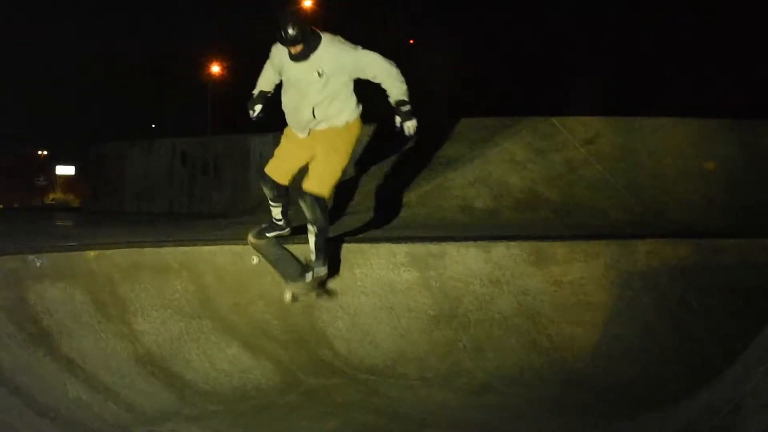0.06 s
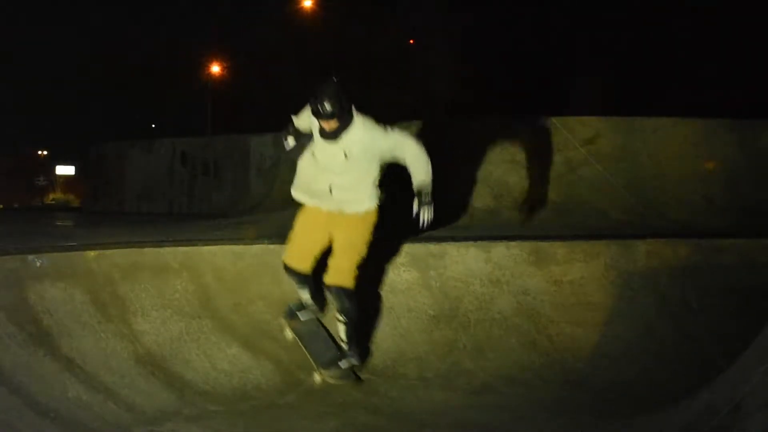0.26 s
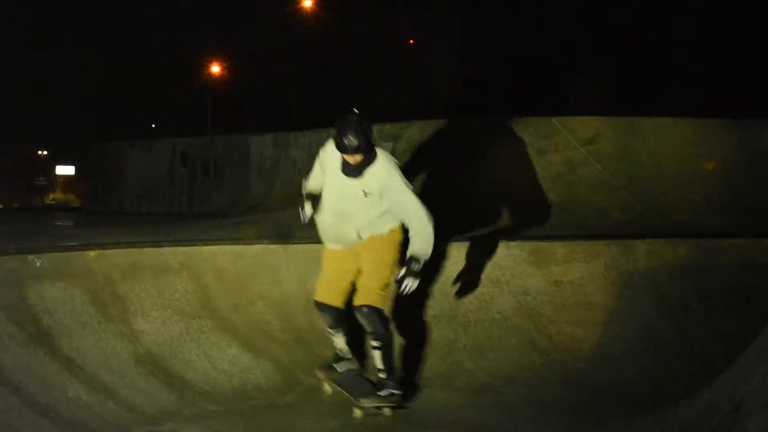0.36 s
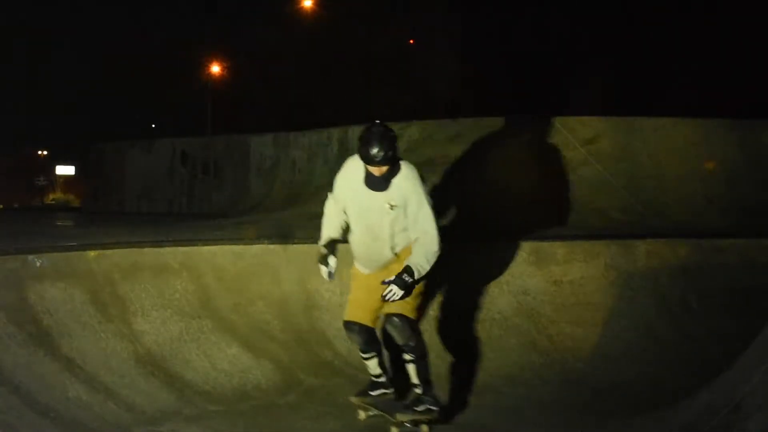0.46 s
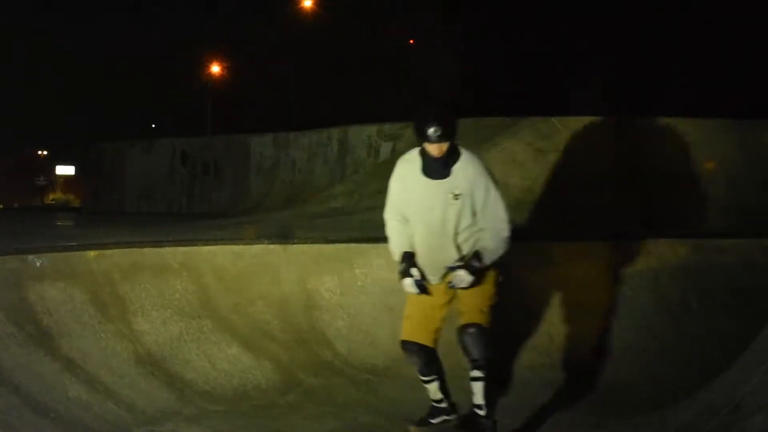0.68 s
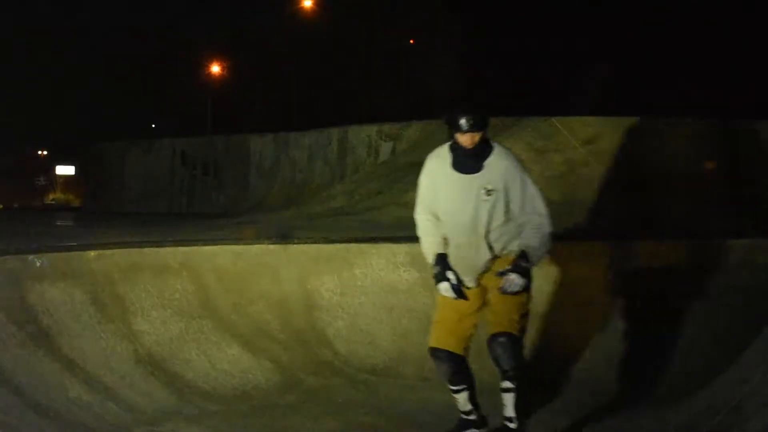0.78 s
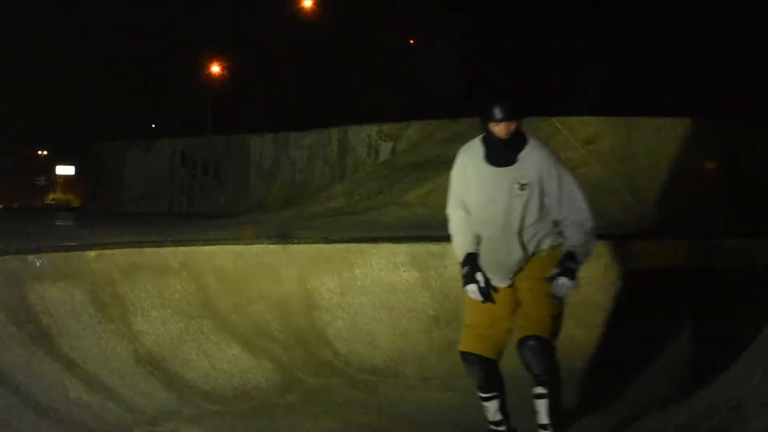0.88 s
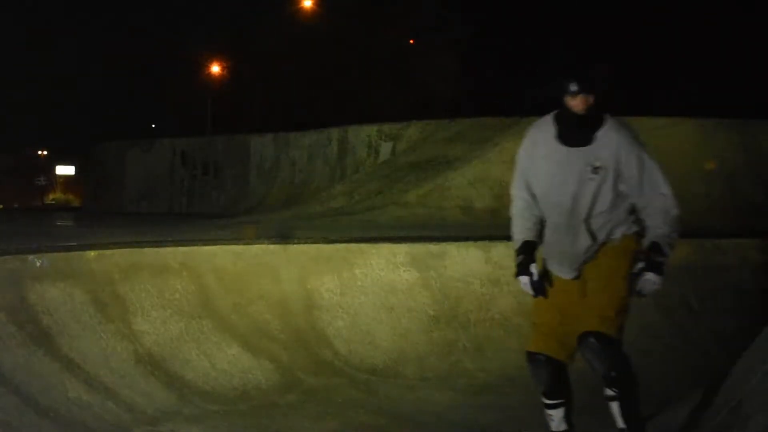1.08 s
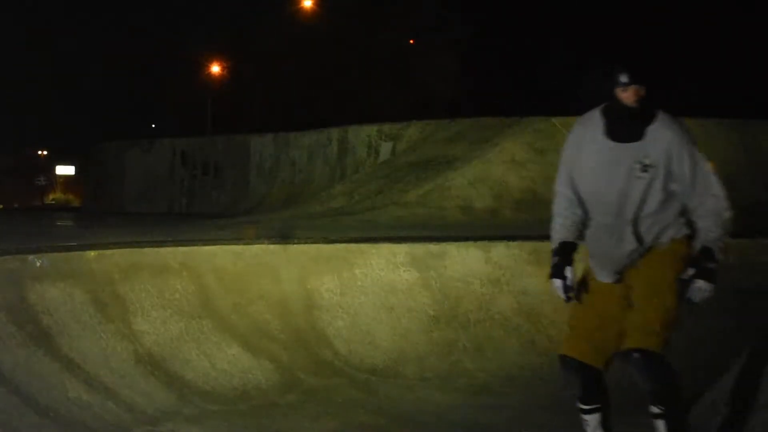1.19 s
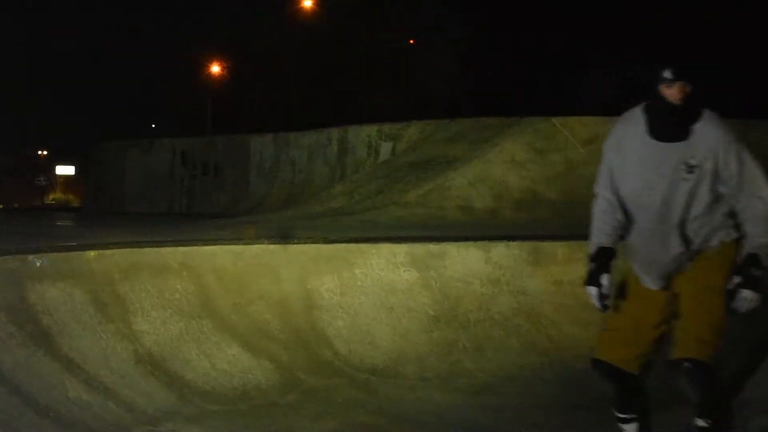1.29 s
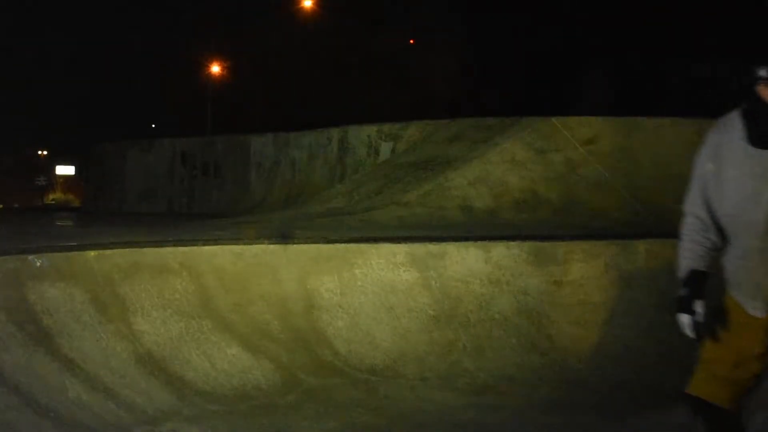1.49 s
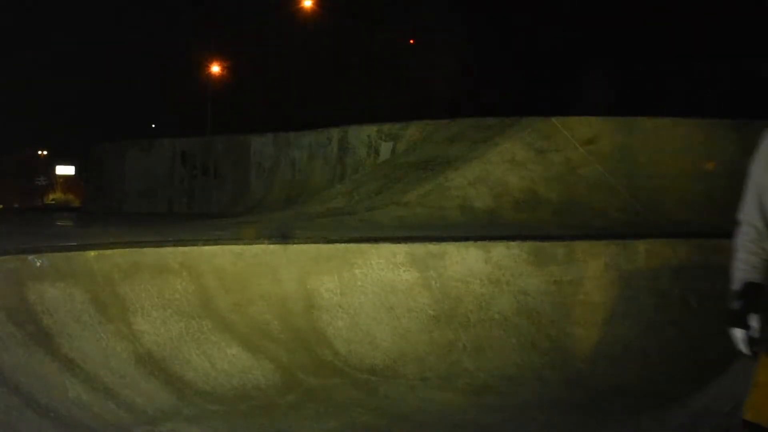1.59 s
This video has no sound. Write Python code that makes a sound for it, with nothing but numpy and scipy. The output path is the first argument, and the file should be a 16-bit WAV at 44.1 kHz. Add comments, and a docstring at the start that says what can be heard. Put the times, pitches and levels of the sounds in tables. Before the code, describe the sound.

A skateboard slams onto concrete at about 0.2 seconds, just after a faint shoe scuff, in a quick ringing clatter that overloads the microphone. From 0.3 seconds the wheels rumble over grit, bumping across seams near 0.6, 1.1 and 1.2 seconds. They then sing faintly in a turn until about 1.6 seconds, with a sharp metal click at 1.4. A soft echo and quiet machine hum lie underneath.

```python
"""A machine hums at night and shoes scuff briefly as a skateboard drops into a concrete bowl.
Wheels and deck (the wooden board) slam down in a quick, ringing clatter that overloads the microphone.
The wheels then rumble over grit, bump across seams and sing as they scrub sideways in a turn.
The bowl adds a soft echo, and the hum swells and fades underneath."""
import sys
import numpy as np
from scipy import signal
from scipy.fft import rfft, irfft, next_fast_len
from scipy.io import wavfile
from scipy.ndimage import map_coordinates

SR = 44100
rng = np.random.default_rng(int(sys.argv[2]) if len(sys.argv) > 2 else 0)


def master(y):
    """Save y as 16-bit WAV."""
    cut = np.clip(np.atleast_2d(y).T, -1, 1)
    pcm = np.round(cut * 32767)  # scale
    wavfile.write(sys.argv[1], SR, pcm.astype(np.int16))


N = 72765  # samples: 1.65 s


def amp(db):
    """Turn decibels into a volume multiplier."""
    return 10 ** (np.asarray(db) / 20)


def unit(x):
    """Scale a signal to an average (rms) level of 1."""
    return x / np.sqrt(np.mean(x ** 2) + 1e-20)


def along(points, hz):
    """Read between rows of (pitch_hz, value), with octaves evenly spaced."""
    pitches, values = np.transpose(points)
    return np.interp(np.log(hz + 1), np.log(pitches + 1), values)


def curves(rows):
    """Join rows of (time_s, values...) with straight lines, one curve per value."""
    times, *columns = np.transpose(rows)
    return [np.interp(np.arange(N) / SR, times, column) for column in columns]


def wobble(rate):
    """A smooth curve through `rate` random points a second."""
    return map_coordinates(rng.standard_normal(N // 10), [np.arange(N) * rate / SR], order=3)


def colour(x, spectrum):
    """Shape the tone of x. A colour lists how strong each pitch is compared with the others."""
    size = 4096
    gains = unit(amp(along(spectrum, np.fft.rfftfreq(size, 1 / SR))))
    cepstrum = irfft(np.log(gains))
    # fold it so that the filter never sounds ahead of a hit
    cepstrum[1:size // 2] *= 2
    cepstrum[size // 2 + 1:] = 0
    response = irfft(np.exp(rfft(cepstrum)))
    return signal.fftconvolve(x, response)[:len(x)]


def add(out, start_s, x):
    """Mix x into out from start_s on."""
    part = out[round(start_s * SR):][:len(x)]
    part += x[:len(part)]


def fade(fade_s, size=8192):
    """The dying away of one hit: 60 dB quieter after fade_s."""
    return np.exp(-np.log(1000) * np.arange(size) / SR / fade_s)


def ping(hz, fade_s):
    """One ringing tone that builds up within half a cycle and dies away."""
    shape = fade(fade_s)
    cycles = hz * np.arange(len(shape)) / SR
    return shape * (1 - np.exp(-2 * cycles)) * np.sin(2 * np.pi * cycles)


def bursts(rows, spectrum):
    """Rough contacts: a puff of noise for each row of (start_s, level_db, fade_s)."""
    out = np.zeros(N)
    for start_s, db, fade_s in rows:
        shape = fade(fade_s)
        burst = colour(shape * rng.standard_normal(len(shape)), spectrum)
        add(out, start_s, amp(db) * burst * np.linalg.norm(shape) / np.linalg.norm(burst))
    return out


def grains(per_s=5000, spread_db=1.5):
    """Tiny random knocks against a gritty surface."""
    hit = rng.random(N) < per_s / SR
    return hit * rng.standard_normal(N) * amp(spread_db * rng.standard_normal(N))


def machine(hum_hz=106.6):
    """A machine's low, wavering hum with a thin whine above it."""
    def tone(hz, drift):
        pitch_hz = hz * (1 + drift * wobble(11.84))
        return np.sqrt(2) * np.sin(2 * np.pi * np.cumsum(pitch_hz) / SR)
    # swelling and fading of the hum: time_s, level_db
    hum_levels = [(0, -38), (.25, -47), (.34, -59), (.47, -49), (.55, -44), (.8, -36), (.95, -39.5),
                  (1.35, -42), (1.5, -52), (1.65, -46.5)]
    # tones of the whine: pitch_hz, level_db
    whine_tones = [(571, -46.5), (856, -47), (1432, -55.5)]
    hum_db, = curves(hum_levels)
    hum = amp(hum_db + 1.3 * wobble(14)) * tone(hum_hz, drift=.012)
    whine = sum(amp(db) * tone(hz, drift=.001) for hz, db in whine_tones)
    return hum + whine


def night_air():
    """A soft, steady rush of air."""
    # colour of the air: pitch_hz, relative_db
    air_colour = [(20, -30), (50, 1), (75, -2), (200, 5), (350, -2.5), (700, -9.5), (1400, -4.5),
                  (2500, -20.5), (6000, -28), (12000, -48), (16000, -37)]
    return amp(-40) * unit(colour(rng.standard_normal(N), air_colour))


def bowl_echo(x, level_db=-22):
    """The concrete walls throw sound back; high pitches die sooner than low ones."""
    # length of the echo: pitch_hz, fade_s
    fade_times = [(100, 1), (500, 0.85), (2000, 0.49), (6000, 0.31), (14000, 0.42)]
    hz, time_s, noise = signal.stft(rng.standard_normal(SR), SR, nperseg=256)
    decay = np.exp(-np.log(1000) * time_s / along(fade_times, hz)[:, None])
    _, tail = signal.istft(noise * decay, SR, nperseg=256)
    return amp(level_db) * signal.fftconvolve(x, tail / np.linalg.norm(tail))[:N]


def takeoff():
    """Shoes scuff the board's grip tape, then the first wheels brush the wall."""
    # the scuff: time_s, level_db
    scuff_levels = [(.065, -75), (.08, -42.5), (.096, -50), (.11, -65)]
    # soft touch of the wheels: start_s, level_db, fade_s
    touch = [(.2125, -24.5, 0.034)]
    # their colours: pitch_hz, relative_db
    scuff_colour = [(1500, -37), (3000, -7), (3750, 1), (4500, -12), (8000, -13), (16000, -21)]
    touch_colour = [(40, -36), (120, -18), (210, 5), (350, -6), (800, -5), (3000, -37)]
    scuff_db, = curves(scuff_levels)
    scuff = amp(scuff_db) * unit(colour(grains(), scuff_colour))
    return scuff + bursts(touch, touch_colour)


def rattle(fade_s=.016):
    """Loose hardware ticks lightly."""
    # the ticks: start_s, level_db
    ticks = [(0.1022, -36), (0.108, -38), (0.125, -40), (0.152, -41), (.177, -34.5), (.196, -38),
             (1.278, -40), (1.361, -39), (1.392, -37), (1.401, -39)]
    # their colour: pitch_hz, relative_db
    tick_colour = [(500, -22), (3000, 1), (6500, -2.5), (9000, -4), (11500, 4), (13000, -9), (16000, -9)]
    return bursts([(start_s, db, fade_s) for start_s, db in ticks], tick_colour)


def stone_click():
    """A small stone clicks sharply under the wheels and rings."""
    # the click: start_s, level_db, fade_s
    clicks = [(1.4221, -14, 0.012)]
    # its colour: pitch_hz, relative_db
    click_colour = [(100, -30), (800, 0.5), (1300, -1), (1900, 9), (2400, -15), (3100, -9), (6000, -16),
                    (8500, -7.5), (12000, -16), (16000, -22)]
    # ringing tones of the click: pitch_hz, relative_db, fade_s
    click_tones = [(1763, -1, .025), (3040, -9, 0.018)]
    out = bursts(clicks, click_colour)
    for start_s, db, _ in clicks:
        for hz, tone_db, fade_s in click_tones:
            add(out, start_s, amp(db + tone_db) * ping(hz, fade_s))
    return out


def seam_bumps():
    """Wheels cross seams in the concrete, each with a scrape and a thump."""
    # the crossings: start_s, scrape_db, fade_s, thump_hz, thump_db
    seams = [(.4345, -29, .02, 600, -20), (0.6159, -22, 0.019, 1160, -20), (0.6191, -24, 0.021, 1930, -22),
             (1.06, -18.5, 0.034, 497, -20), (1.0636, -21, 0.031, 656, -22),
             (1.072, -22.5, 0.027, 510, -10), (1.0757, -20.5, 0.021, 750, -15.5),
             (1.205, -25.5, 0.03, 406, -18), (1.2203, -19.5, 0.016, 436, -6.5)]
    # colour of the scrape: pitch_hz, relative_db
    scrape_colour = [(40, -38), (200, -5), (400, 4), (750, 3), (1100, -9), (1600, -3.5), (3000, -16.5),
                     (6000, -20.5), (10000, -20.5), (16000, -31)]
    out = bursts([row[:3] for row in seams], scrape_colour)
    for start_s, _, fade_s, thump_hz, thump_db in seams:
        add(out, start_s, amp(thump_db) * ping(thump_hz, fade_s))
    return out


def carve(width_hz=540):
    """Wheels scrub sideways and sing: a narrow band of noise that rises a little, then sinks."""
    # the singing: time_s, pitch_hz, level_db
    glide = [(1.0, 1623, -62), (1.22, 1629, -38), (1.33, 1730, -36.5), (1.45, 1694, -34), (1.5, 1624, -34),
             (1.59, 1540, -31), (1.65, 1523, -34)]
    hz, db = curves(glide)
    lowpass = signal.butter(2, width_hz / 2, fs=SR)
    slow_a, slow_b = signal.lfilter(*lowpass, rng.standard_normal((2, N)))
    phase = 2 * np.pi * np.cumsum(hz) / SR
    return amp(db) * unit(slow_a * np.cos(phase) + slow_b * np.sin(phase))


def rolling(turn_hz=15.4, pulse_db=1, rough_db=1.2):
    """Grit shakes the board, scrapes and hisses, pulsing a little with each turn of the wheels."""
    # loudness of the three layers: time_s, rumble_db, scrape_db, hiss_db
    levels = [(0, -66, -59, -59.5), (.09, -45, -50, -61), (.21, -42, -47.5, -53), (.3, -29, -38.5, -45),
              (.42, -27.5, -37, -39), (.5, -32.5, -41, -42.5), (0.589, -34.5, -47.5, -49),
              (.72, -34, -49, -49.5), (.77, -31, -45.5, -48.5), (.88, -32, -43.5, -44.5),
              (1.0, -31.5, -43.5, -50), (1.1, -34.5, -40.5, -47.5), (1.17, -36, -49.5, -56),
              (1.3, -39, -46.5, -54.5), (1.39, -39, -45.5, -49.5), (1.5, -34, -47, -52.5),
              (1.59, -37, -44, -54.5), (1.62, -33.5, -36.5, -43), (1.65, -40, -40, -51)]
    # their colours: pitch_hz, relative_db
    rumble = [(40, -26.5), (150, -16.5), (270, -2), (390, 0), (530, 1.5), (640, -5.5), (780, 1.5),
              (1100, -9), (1700, -12.5), (2100, -15.5), (3000, -22.5), (6000, -52), (16000, -80)]
    scrape = [(300, -22), (1500, 3.5), (2300, 5.5), (3200, 0), (4500, -2), (6000, -7), (9000, -20),
              (16000, -52)]
    hiss = [(2000, -26), (5500, -5.5), (8000, 1), (10000, 2.5), (12500, 0), (14500, -7.5), (16000, -14)]
    wheel_angle = 2 * np.pi * turn_hz * np.arange(N) / SR + wobble(2.1)
    flutter_db = rough_db * wobble(60.16) - pulse_db * np.sin(wheel_angle)
    out = np.zeros(N)
    for db, spectrum in zip(curves(levels), (rumble, scrape, hiss)):
        grit = grains() + 0.27 * rng.standard_normal(N)
        out += amp(db + flutter_db) * unit(colour(grit, spectrum))
    return out


def landing(detune=0.0056, pivot_hz=1000):
    """Each blow cracks, thuds through the wheels and rings the deck; harder blows ring brighter."""
    # the blows: start_s, relative_db, extra_ring_db, extra_thud_db, fade_s, hardness_db_per_octave
    blows = [(0.2228, 9, -5, 1.5, 0.029, -2), (0.2324, -2.5, -3, -4, 0.027, 8),
             (0.2385, -6.5, -4.5, -16, 0.063, 1), (0.2443, -4.5, -1.5, -1.5, 0.029, 5.5),
             (0.2623, -11.5, -4.5, -5, 0.0062, -1), (0.265, -15, 1, 4.5, 0.044, -6),
             (0.271, -17.5, 0, 6.5, 0.04, 2), (0.2785, -0.5, 0.5, -6, 0.014, 0),
             (0.2886, -3, -11, -1, 0.03, 0), (0.2904, -10.5, 2, 0, 0.021, -8.5),
             (0.2956, -15.5, -10, 9.5, 0.026, 8)]
    # ringing tones of deck and axle mounts: pitch_hz, relative_db, fade_s
    deck_tones = [(346, -17, .08), (520.3, -4, 0.048), (740, -9.5, 0.04), (848, -11, 0.037),
                  (1248, -13.5, 0.085), (1338, -6.5, 0.075), (1529, -5.5, 0.059), (1644, 1, 0.04),
                  (1752, -1.5, 0.024), (2178, -5.5, 0.045), (2300, -9, 0.045), (2440, -11.5, 0.023),
                  (3260, -23, 0.022), (3410, -12, 0.018)]
    # colours of the contacts: pitch_hz, relative_db
    crack_colour = [(60, -33), (300, -5.5), (1500, 4.5), (2400, 2), (4000, -4.5), (5600, -10), (8500, -11),
                    (12000, -13), (16000, -26.5)]
    thud_colour = [(30, -20), (130, -11.5), (240, -6.5), (380, -6.5), (510, -3.5), (640, -3), (800, -1),
                   (1080, -14), (2500, -20.5), (16000, -77)]
    ring = np.zeros(N)
    cracks, thuds = [], []
    for start_s, db, ring_db, thud_db, contact_s, hardness in blows:
        cracks.append((start_s, db, contact_s))
        thuds.append((start_s, db + thud_db, contact_s))
        for hz, tone_db, fade_s in deck_tones:
            chance_db, pitch_shift, direction = rng.standard_normal(3)
            bright_db = hardness * np.log2(hz / pivot_hz)
            gain = amp(db + ring_db + tone_db + chance_db + bright_db)
            tone = ping(hz * (1 + detune * pitch_shift), fade_s)
            add(ring, start_s, np.sign(direction) * gain * tone)
    crack = bursts(cracks, crack_colour)
    thud = bursts(thuds, thud_colour)
    return amp(-2) * ring + amp(1.5) * crack + amp(-2.5) * thud


def scene():
    """The board and its echo over the machine and the night air, in one channel."""
    board = takeoff() + landing() + rolling() + carve() + seam_bumps() + stone_click() + rattle()
    return (board + bowl_echo(board) + machine() + night_air())[None]


def record(dry, top_hz=15850):
    """The landing overloads the microphone, flattening its peaks; nothing above top_hz gets through."""
    clipped = np.clip(dry, -1, 1)
    size = 2 * next_fast_len(N)
    passes = np.fft.rfftfreq(size, 1 / SR) < top_hz
    return irfft(rfft(clipped, size) * passes, size)[..., :N]


dry = scene()
out = record(dry)
master(out)
```